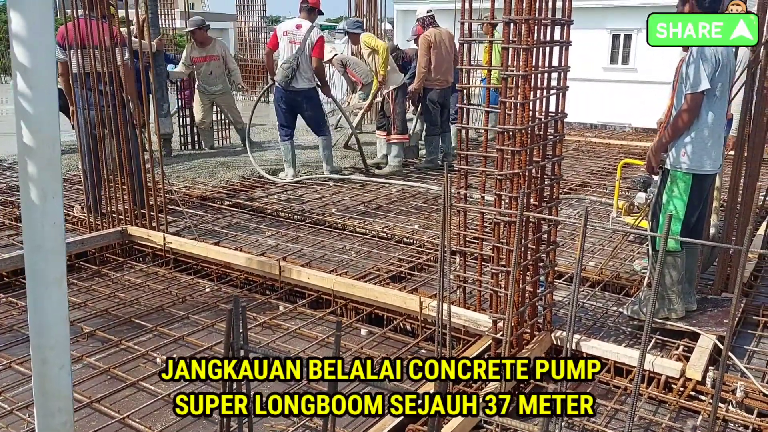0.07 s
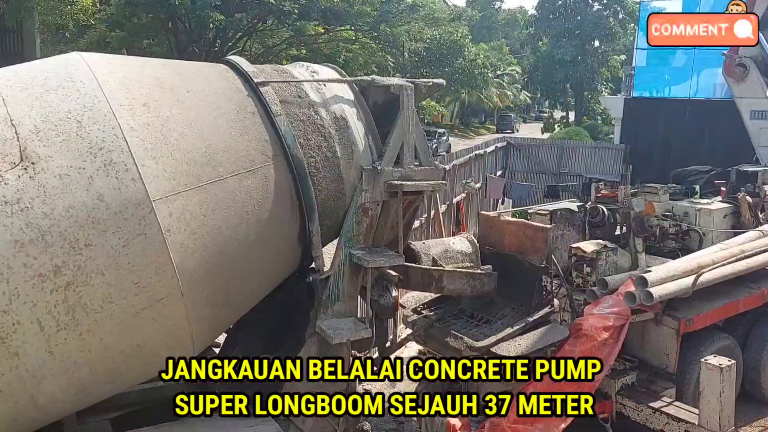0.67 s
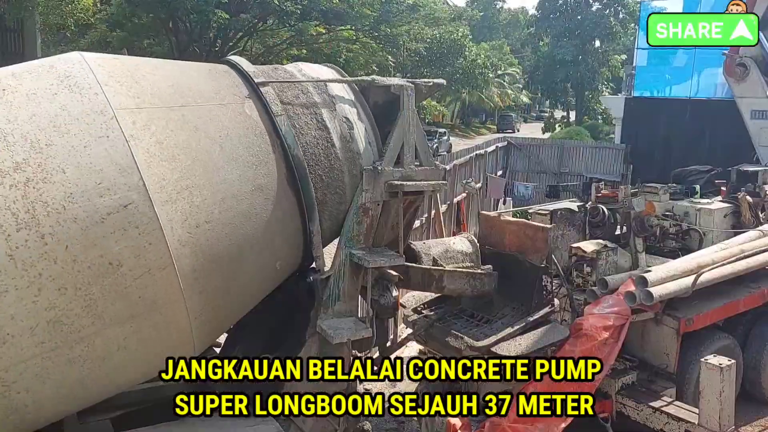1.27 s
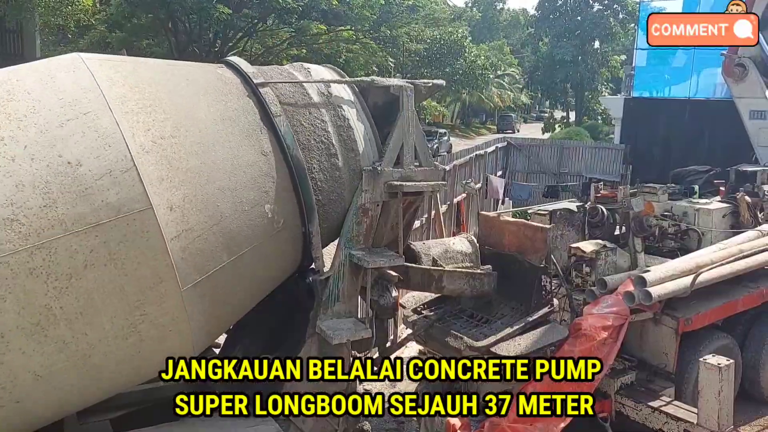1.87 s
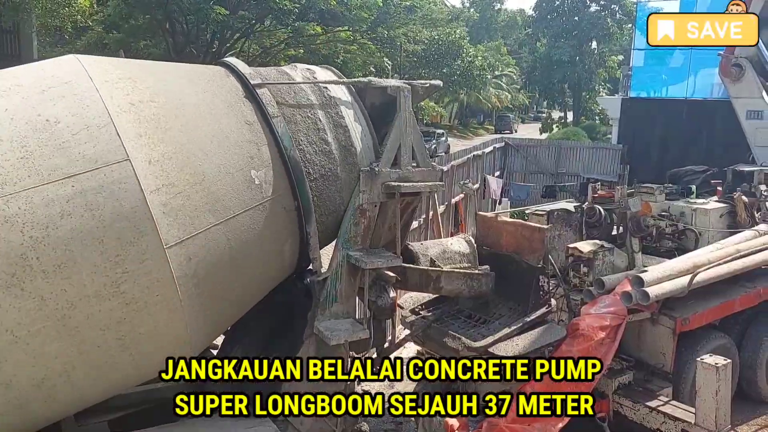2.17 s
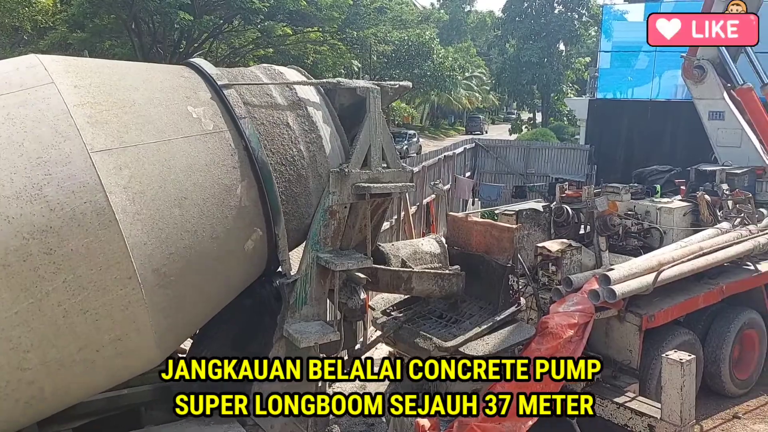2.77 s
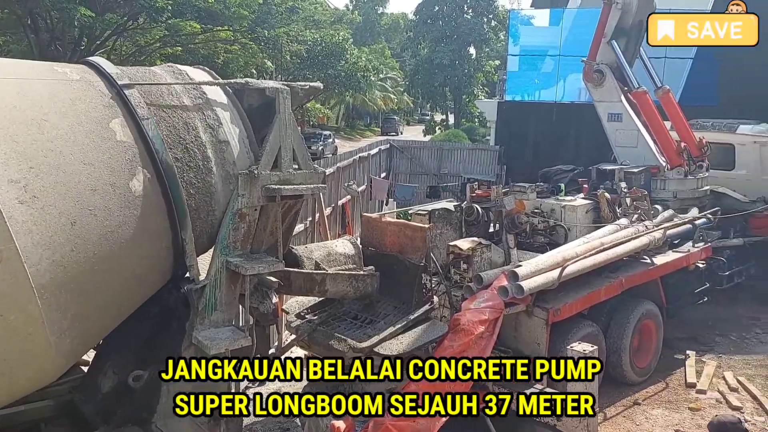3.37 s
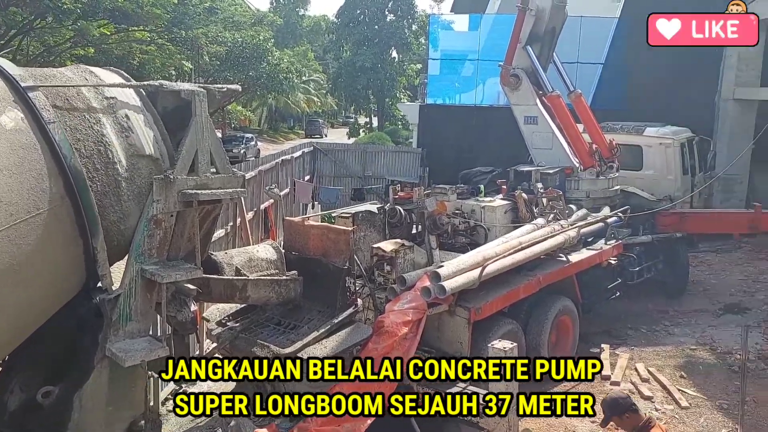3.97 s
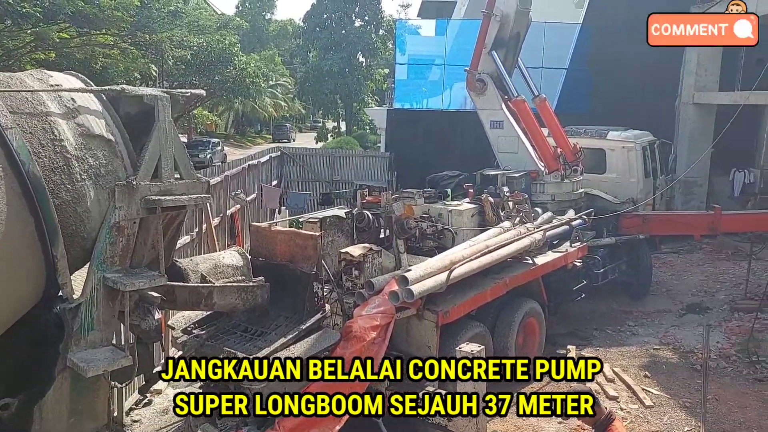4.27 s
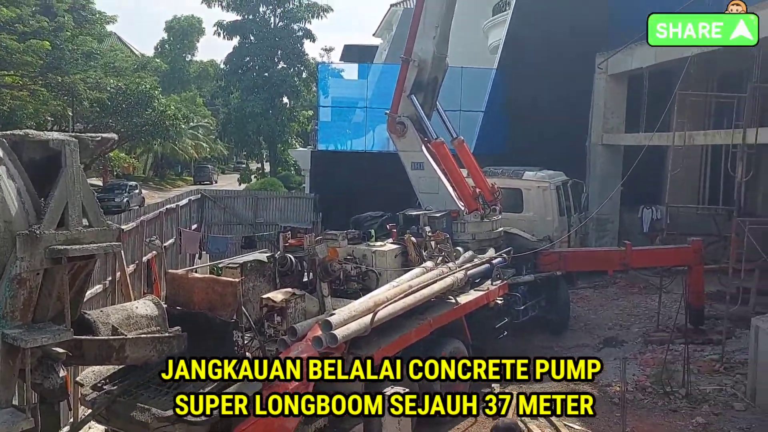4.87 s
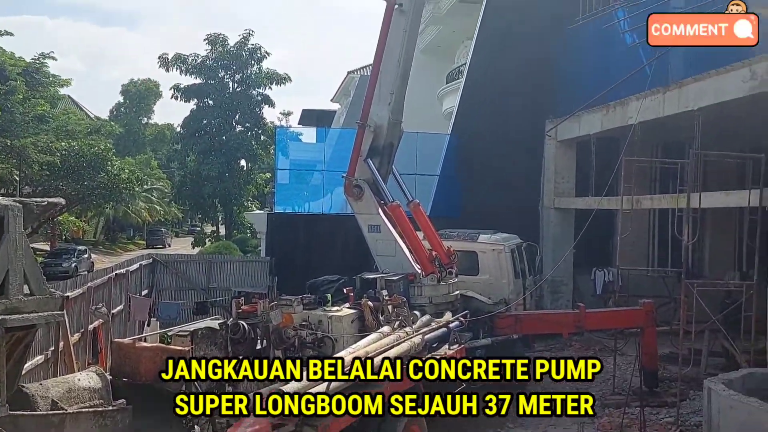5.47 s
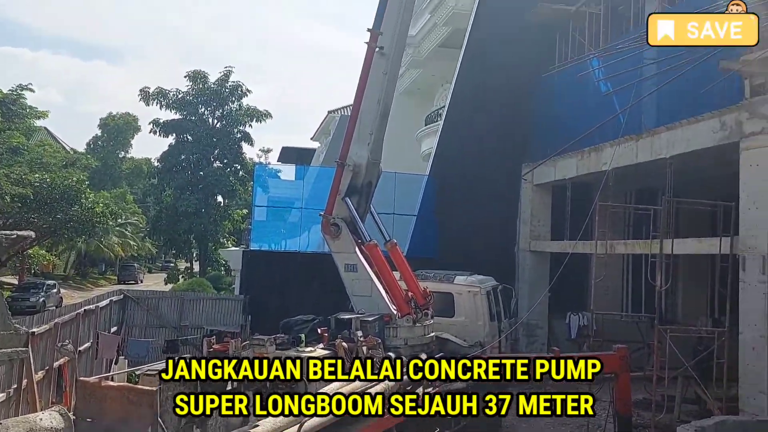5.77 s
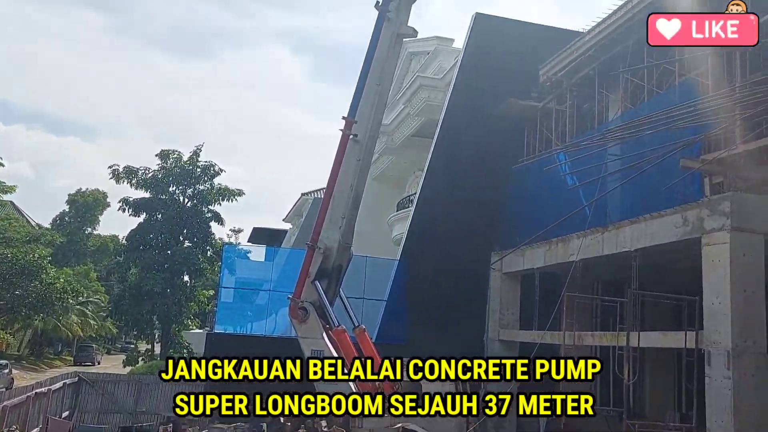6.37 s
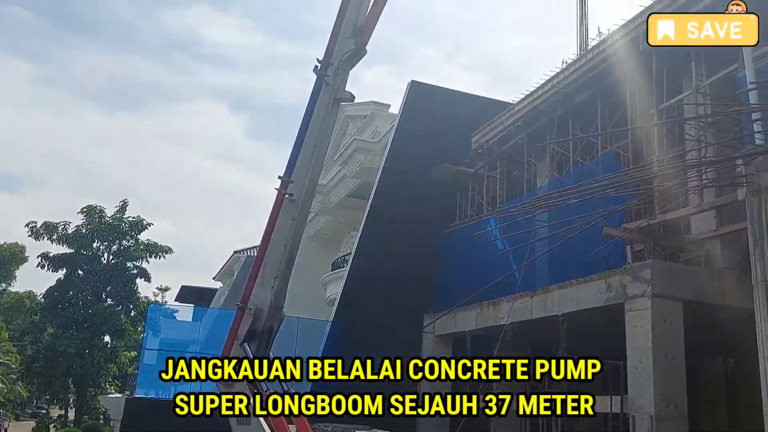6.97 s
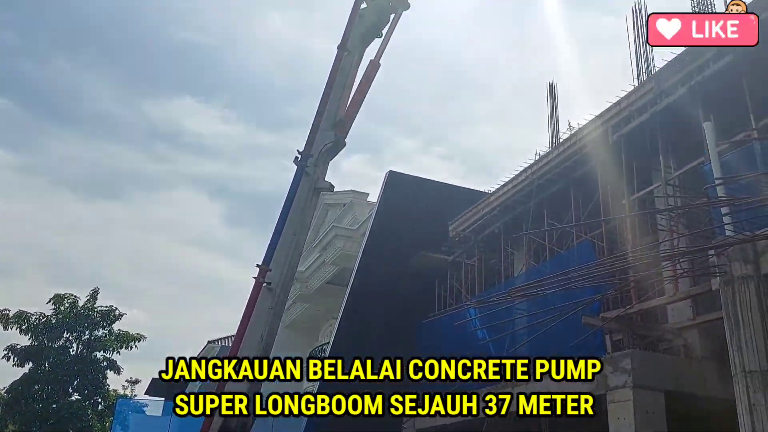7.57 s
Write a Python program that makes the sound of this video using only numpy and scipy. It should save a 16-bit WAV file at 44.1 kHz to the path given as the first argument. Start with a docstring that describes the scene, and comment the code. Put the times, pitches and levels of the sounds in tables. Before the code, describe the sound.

For the first half second, a concrete vibrator hums over building site rumble while wet concrete rushes in quick gritty surges over ringing steel bars, brighter on the left. This fades out by about 0.6 seconds, leaving an instant of silence. At 0.7 seconds a pump truck's diesel engine fades in quickly and drones and clatters loudly at constant speed, slightly to the left. A valve lets off one bright, short hiss of air at about 0.8 seconds. Hydraulic pumps add a hum that slowly swells and dips, with a faint thin whistle high above. A mixer truck rumbles alongside, giving occasional soft low booms, for example around 2, 3.6 and 5.3 seconds. Between roughly 4 and 5.5 seconds the engine's tone shifts slightly as the microphone turns toward the pump. The drone continues until the end, around 7.6 seconds.

```python
"""Concrete work on a building site

A poker vibrator's eccentric weight hums on a rebar deck and wet concrete rushes briefly over the ringing
bars; the sound fades out. Then a pump truck fades in: the periodic firing of its six-cylinder diesel
drones and clatters, two hydraulic pumps of nearly equal pitch beat slowly, a mixer truck rumbles
beside it and a valve lets off one hiss of air."""
import sys
import numpy as np
from scipy import signal
from scipy.fft import rfft, irfft
from scipy.io import wavfile

SR = 44100
rng = np.random.default_rng(int(sys.argv[2]) if len(sys.argv) > 2 else 0)


def pcm_store(signal):
    """Save signal as 16-bit PCM."""
    levels = np.round(np.clip(np.atleast_2d(signal), -1, 1) * 32767)
    wavfile.write(sys.argv[1], SR, levels.astype(np.int16).T)


N = 340011
TIME = np.arange(N) / SR
BINS = np.fft.rfftfreq(N, 1 / SR)
CUTOFF_HZ = 15600


def from_db(db):
    """Amplitude ratio of a level in decibels."""
    return 10 ** (np.asarray(db) / 20)


def rms_one(x):
    """Normalisation to unit mean power."""
    return x / np.sqrt(np.mean(x ** 2) + 1e-20)


def at_hz(points, hz, axis=1):
    """Interpolation of one table column on a logarithmic frequency axis."""
    points = np.array(points)
    return np.interp(np.log(hz + 1e-6), np.log(points[:, 0]), points[:, axis])


def colour(x, db):
    """Zero-phase filtering by a gain in dB for each frequency bin."""
    return irfft(rfft(x) * from_db(db), N)


def drift(rate_hz):
    """Random fluctuation: low-pass noise of unit rms."""
    return rms_one(irfft(rfft(rng.standard_normal(N)) / (1 + (BINS / rate_hz) ** 2), N))


def tone(turns, db):
    """Simple harmonic motion at the given rms level."""
    return np.sqrt(2) * from_db(db) * np.sin(2 * np.pi * turns)


def envelope(start, attack, hold, release):
    """Linear rise to 1, a hold, then exponential decay with time constant release."""
    age = TIME - start
    return np.clip(age / attack, 0, 1) * np.exp(-np.maximum(age - attack - hold, 0) / release)


# Coherence of left and right: f/Hz, coherence (0-1)
COHERENCE = [(60, 0.9), (300, 0.91), (600, 0.62), (1400, 0.74), (2400, 0.48), (3600, 0.3), (4750, 0.44),
             (6500, 0), (9000, 0.27)]

def pair(mid, side, hz):
    """Partial coherence: reflections make the left and right spectra less alike in the treble."""
    alike = np.clip(at_hz(COHERENCE, hz), 0, 1)
    return np.sqrt((1 + alike) / 2) * mid + np.sqrt((1 - alike) / 2) * side * np.array([[1], [-1]])


def noise(spectrum):
    """Gaussian stereo noise with the given spectrum level (dB in a 1 Hz band)."""
    mid, side = rfft(rng.standard_normal((2, N))) * np.sqrt(SR / 2)
    return irfft(pair(mid, side, BINS) * from_db(at_hz(spectrum, BINS)), N)


# Harmonics of the rotation: harmonic number, relative level/dB
VIBRATOR_HARMONICS = [(1, -3.5), (2, -7), (3, -13), (4, -18), (5, -22.5)]
# Contacts with the bars: t/s, hold/s, gain/dB
BAR_CONTACTS = [(0.196, 0.027, -16.5), (0.343, .06, -25.5)]

def vibrator(speed_hz=150, free_db=-31, dulling_db=-3.5):
    """Forced vibration: an eccentric weight hums; touching the bars lifts the low harmonics most."""
    contact = sum(from_db(db) * envelope(start, attack=.024, hold=hold, release=.018)
                  for start, hold, db in BAR_CONTACTS)
    turns = np.cumsum(speed_hz * (1 + 0.015 * drift(8))) / SR
    hum = 0
    for k, db in VIBRATOR_HARMONICS:
        coupling = from_db(free_db) + contact * from_db(dulling_db * (k - 1))
        hum = hum + tone(round(k) * turns + rng.random(), db) * coupling
    return hum


# Spectrum of the site: f/Hz, relative level/dB
SITE_SPECTRUM = [(18, -38), (30, -9.5), (197, -6.5), (332, -4.5), (420, -13), (518, -13.5), (728, -13.5),
                 (1170, -20.5), (1260, -23), (3680, -30), (4420, -36.5), (9190, -39), (11500, -35.5),
                 (15500, -42.5)]

def site_rumble():
    """Broadband noise, strongest in the bass, builds up and then holds."""
    level_db = np.interp(TIME, [0, 0.11], [-31, -26])
    return rms_one(noise(SITE_SPECTRUM)) * from_db(level_db)


# Surges of concrete: t/s, attack/s, hold/s, level/dB
CONCRETE_SURGES = [(0.242, 0.048, 0.057, -25), (0.341, 0.039, .035, -24), (0.413, .006, 0.0088, -22.5)]

def concrete_flow(trickle_db=-11.5):
    """Incoherent addition: abrupt surges and the weaker trickles they leave sum in power."""
    power = 0
    for start, attack, hold, db in CONCRETE_SURGES:
        surge = from_db(db) * envelope(start, attack, hold, release=.0082)
        trickle = from_db(db + trickle_db) * envelope(start, attack, hold, release=.085)
        power = power + surge ** 2 + trickle ** 2
    return np.sqrt(power)


# Spectrum of flowing concrete: f/Hz, relative level/dB
RUSH_SPECTRUM = [(200, -18.5), (350, 1), (600, -11), (1000, -3), (1500, -9), (2500, -6), (4000, -15),
                 (7000, -24.5), (15500, -26)]
# Modes of the bars: f/Hz, width/Hz, gain/dB
BAR_MODES = [(1160, 60, 4), (1470, 42, 11.5), (1620, 210, 7), (1920, 60, 2.5), (2720, 96, 2),
             (3280, 96, -0.5)]

def concrete_rush():
    """Resonance: the gritty noise of wet concrete excites the modes of the bars."""
    ring_db = sum(db / (1 + (2 * (BINS - hz) / width) ** 2) for hz, width, db in BAR_MODES)
    grit = noise(RUSH_SPECTRUM) * from_db(1.9 * drift(150))
    return rms_one(colour(grit, ring_db)) * concrete_flow()


# Balance of the deck: f/Hz, left minus right level/dB
DECK_LEFT_EXCESS = [(60, -1), (110, 0), (200, 1), (380, 0), (700, -2), (1290, 4.5), (2380, 4.5),
                    (4400, 13.5), (8120, 17.5), (15000, 6)]

def deck():
    """Interaural level difference places the treble of the deck's sounds on the left."""
    balance_db = at_hz(DECK_LEFT_EXCESS, BINS) * np.array([[.5], [-.5]])
    return colour(vibrator() + site_rumble() + concrete_rush(), balance_db)


CYCLE_HZ, CYLINDERS = 20.48, 6   # every cylinder fires once a cycle
# Firing strength, cylinder by cylinder: relative level/dB
FIRING_DB = [1.5, -1, .5, -1.5, 1, -.5]

def knocks(cycles, decay, floor):
    """Impulsive excitation: each firing lifts an envelope that decays (in firing intervals) to a floor."""
    firing = cycles * CYLINDERS
    force = from_db(FIRING_DB)[firing.astype(int) % CYLINDERS]
    return rms_one(floor + force * np.exp(-(firing % 1) / decay))


# Fan and injection noise: f/Hz, spectrum level/dB
HISS_SPECTRUM = [(500, -100), (760, -65), (1000, -60.5), (1500, -64), (1800, -65), (2250, -62.5),
                 (2700, -66), (3200, -73.5), (4000, -75), (4750, -71), (5600, -77), (7500, -76.5),
                 (9000, -82), (12000, -77), (15000, -83.5)]

def engine_hiss(cycles):
    """Broadband noise of fan and injection, very weakly modulated by the firings."""
    return noise(HISS_SPECTRUM) * knocks(cycles, decay=0.91, floor=20.0) * from_db(0.52 * drift(27))


# Strong engine lines: multiple of the cycle rate, level/dB beside the mixer, level/dB facing the pump
ENGINE_ORDERS = [(6, -17.5, -17.1), (7, -41.8, -40.9), (9, -40.8, -44.1), (12, -24.8, -25.3),
                 (13, -32.5, -33.0), (14, -35.6, -34.8), (16, -39.0, -39.0), (23, -42.4, -44.8),
                 (24, -39.4, -40.2), (26, -33.6, -37.2), (27, -39.1, -39.6), (28, -43.8, -41.6),
                 (30, -36.3, -41.2), (33, -43.8, -50.9), (39, -42.0, -39.0), (44, -44.5, -49.7),
                 (46, -42.6, -44.0), (51, -45.6, -43.7), (58, -44.2, -39.5), (59, -50.0, -41.0),
                 (66, -47.1, -43.2), (72, -43.5, -42.9), (74, -41.8, -44.5), (98, -44.1, -44.1),
                 (99, -45.8, -40.9), (100, -47.5, -44.3), (104, -35.5, -44.0), (134, -49.4, -44.7),
                 (138, -46.2, -54.9)]
# The listener's turn from mixer to pump: t/s, share facing the pump (0-1)
FACING_PUMP = [(3.6, 0.057), (5.6, 0.92)]

def drone(cycles):
    """Harmonic series: exhaust and ringing parts sound at engine orders; the firing tone wavers least."""
    facing = np.interp(TIME, *np.transpose(FACING_PUMP))
    lines = 0
    for order, mixer_db, pump_db in ENGINE_ORDERS:
        k = round(order)
        waver_db = .45 if k == CYLINDERS else 1.3
        # firing harmonics are locked in phase; the other lines slip against them
        slip = .5 if k % CYLINDERS == 0 else rng.random() + 0.042 * drift(1)
        level_db = mixer_db + (pump_db - mixer_db) * facing + waver_db * drift(3.3)
        lines = lines + tone(k * cycles + slip, level_db)
    return lines


# Spectral envelope of the remaining engine lines: f/Hz, relative level/dB per line
RATTLE_SPECTRUM = [(160, -45.2), (340, -45.8), (430, -47.2), (620, -49.7), (760, -51.0), (1000, -48.4),
                   (1400, -49.3), (1750, -52.1), (2200, -50.5), (2700, -52.8), (3300, -61.2), (4700, -63.4),
                   (6000, -69.4), (9000, -85)]

def rattle(cycles, size=16384):
    """Periodic excitation: injectors and valves shake the block alike each cycle, in a comb of lines."""
    angle = np.arange(size) / size
    mid, side = rfft(rng.standard_normal((2, size)) * knocks(angle, decay=0.38, floor=0.38))
    hz = np.arange(len(mid)) * CYCLE_HZ
    amplitude = from_db(at_hz(RATTLE_SPECTRUM, hz)) * (hz > CYLINDERS * CYCLE_HZ) * (hz < CUTOFF_HZ)
    amplitude[[round(row[0]) for row in ENGINE_ORDERS]] = 0   # these lines belong to the drone
    lines = pair(mid / abs(mid), side / abs(side), hz) * amplitude
    one_cycle = irfft(lines) * size / np.sqrt(2)
    return np.array([np.interp(cycles % 1, angle, channel) for channel in one_cycle])


def clatter(cycles):
    """Interference: the rattle arrives by two paths, whose mix shifts as the listener moves."""
    mix = 0.36 * TIME + 0.13 * drift(4.0)
    paths = np.cos(mix) * rattle(cycles) + np.sin(mix) * rattle(cycles)
    return paths * from_db(-0.9 + 1.07 * drift(23))


# Swells of the whistle: t/s, gain/dB
WHISTLE_SWELLS = [(2.3, 2), (5.3, 3)]

def gear_whistle(cycles, pitch_hz=9816, carrier_db=-58, waver_db=1.7, swell_s=.4):
    """Amplitude modulation: a thin whistle from the running gear throbs at half the firing rate."""
    throb = 1 + .9 * np.sin(np.pi * CYLINDERS * cycles)
    swells_db = sum(db * np.exp(-((TIME - peak) / swell_s) ** 2) for peak, db in WHISTLE_SWELLS)
    turns = pitch_hz * TIME + .15 * drift(4)
    return tone(turns, carrier_db + swells_db + waver_db * drift(1)) * throb


# Harmonics of each pump: harmonic number, relative level/dB
PUMP_HARMONICS = [(1, 0), (2, -14)]
# Beats: t/s of the opening lull, level/dB of the steady pump at mid-beat
PUMP_BEATS = [(.62, -30.5), (1.35, -30), (1.72, -33), (2.07, -29), (2.43, -28.5), (3.92, -28.5), (5.2, -30),
              (7.2, -31)]

def hydraulic_pumps(pitch_hz=319.3, second_pump_db=-1.5, pull=0.43, last_lull_s=8.26):
    """Beating: one pump gains a turn per beat; half a turn apart, the fundamentals nearly cancel."""
    lulls, levels_db = np.transpose(PUMP_BEATS)
    lulls = np.append(lulls, last_lull_s)
    lead = np.interp(TIME, lulls, np.arange(len(lulls)) + .5)
    # the pumps pull each other into step, so they linger at the swell and pass a lull quickly
    lead = lead - pull * np.sin(2 * np.pi * lead) / (2 * np.pi)
    level_db = np.interp(TIME, (lulls[:-1] + lulls[1:]) / 2, levels_db)
    turns = pitch_hz * TIME
    hum = 0
    for k, db in PUMP_HARMONICS:
        steady = tone(round(k) * turns, level_db + db)
        gaining = tone(round(k) * (turns + lead), level_db + db + second_pump_db)
        hum = hum + steady + gaining
    return hum


# Exhaust and mixer rumble: f/Hz, spectrum level/dB
RUMBLE_SPECTRUM = [(20, -73), (35, -70), (55, -64.5), (72, -53), (100, -54), (150, -52.5), (200, -55),
                   (280, -48), (340, -54.5), (420, -62), (620, -56.5), (760, -65.5), (1100, -100)]
# Soft low booms: t/s, level/dB
MIXER_BOOMS = [(1.19, -36), (1.821, -33), (2.07, -30), (3.58, -31), (4.45, -33), (5.02, -33), (5.33, -31),
               (6.22, -45), (7.10, -34)]

def mixer_truck(idle_hz=44.3, idle_db=-52.5, boom_hz=73.5, boom_s=0.04):
    """Superposition: an idling tone lies under uneven rumble and booms shaped as Gaussian tone bursts."""
    booms = sum(tone(boom_hz * (TIME - peak), db) * np.exp(-((TIME - peak) / boom_s) ** 2)
                for peak, db in MIXER_BOOMS)
    rumble = noise(RUMBLE_SPECTRUM) * from_db(1.1 * drift(3.1))
    idle = tone(idle_hz * TIME + 0.075 * drift(0.62), idle_db)
    return rumble + booms + idle


# Spectrum of escaping air: f/Hz, relative level/dB
AIR_SPECTRUM = [(1500, -35), (4000, -5), (6000, 1), (7400, 3), (9500, -2), (13000, 1), (15500, -7)]

def air_puff(level_db=-30):
    """Jet noise: a valve opens and a bright hiss decays exponentially."""
    outflow = envelope(start=0.822, attack=.08, hold=.035, release=0.14)
    return rms_one(noise(AIR_SPECTRUM)) * from_db(level_db) * outflow


# Lag of the right channel: f/Hz, delay/s
RIGHT_LAG = [(72, .00015), (115, .00069), (130, .00069), (180, .0002), (270, .00032), (900, .00035),
             (1750, .00035), (2200, .00038), (2900, .00042)]
# Response to the trucks: f/Hz, left and right gain/dB before the change near 4.4 s, left and right gain/dB
# after it
TRUCK_RESPONSE = [(123, 0.3, -0.3, 0.5, -0.5), (250, -0.1, 1.0, -0.7, -0.4), (550, 2.2, -1.0, -0.4, -1.5),
                  (850, 0.7, 0.2, -0.4, -0.5), (1200, -0.1, -0.7, 1.6, -0.8), (1600, -0.1, 0.1, -0.4, 0.2),
                  (2100, -0.8, 1.7, -3.4, 1.0), (2700, -1.6, 0.6, -2.9, 2.2), (3700, -0.2, -0.1, -1.3, 1.1),
                  (4800, -0.1, 0.2, -1.8, 1.1), (6800, -1.6, 1.4, -2.1, 1.2), (9000, -16.5, 1.5, 1.5, 0.9),
                  (11500, -10.3, 1.5, -2.3, 2.9), (15000, -8.8, 2.0, -3.3, 2.7)]

def at_listener(x, shade_end_s=4.43, shade_fade_s=0.49):
    """Interaural delay sets the trucks to the left; the left treble is dulled until about 4.4 s, then clears."""
    delay_s = at_hz(RIGHT_LAG, BINS) * np.array([[0], [1]])
    x = irfft(rfft(x) * np.exp(-2j * np.pi * BINS * delay_s), N)
    before = colour(x, [at_hz(TRUCK_RESPONSE, BINS, column) for column in (1, 2)])
    after = colour(x, [at_hz(TRUCK_RESPONSE, BINS, column) for column in (3, 4)])
    cleared = np.clip((TIME - shade_end_s) / shade_fade_s + .5, 0, 1)
    return before * (1 - cleared) + after * cleared


def trucks():
    """Superposition of the diesel, governed to nearly constant speed, its pumps, the mixer and the air."""
    cycles = np.cumsum(CYCLE_HZ * (1 + 0.000394 * drift(1.46))) / SR
    engine = engine_hiss(cycles) + drone(cycles) + clatter(cycles) + gear_whistle(cycles)
    return at_listener(engine + hydraulic_pumps() + mixer_truck() + air_puff())


def fade(progress):
    """Power-law gain: silent at 0, full at 1."""
    return np.clip(progress, 0, 1) ** 1.6


def scene(deck_end_s=0.563, fade_out_s=0.049, truck_start_s=0.701, fade_in_s=0.063):
    """Two sound fields in succession: the deck, a moment of silence, the trucks."""
    fade_out = fade((deck_end_s - TIME) / fade_out_s)
    fade_in = fade((TIME - truck_start_s) / fade_in_s)
    return deck() * fade_out + trucks() * fade_in


def record(dry):
    """Band limiting: an elliptic low-pass filter cuts the highest treble steeply."""
    return signal.sosfilt(signal.ellip(12, .1, 90, CUTOFF_HZ, fs=SR, output="sos"), dry)


dry = scene()
out = record(dry)
pcm_store(out)
```